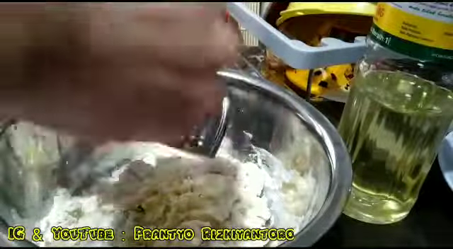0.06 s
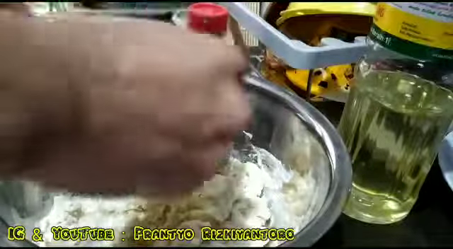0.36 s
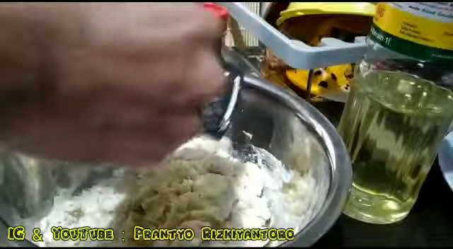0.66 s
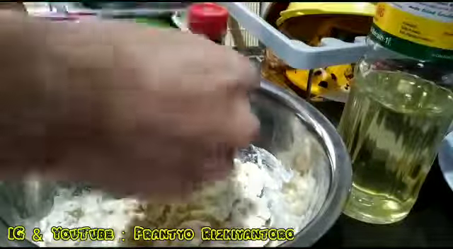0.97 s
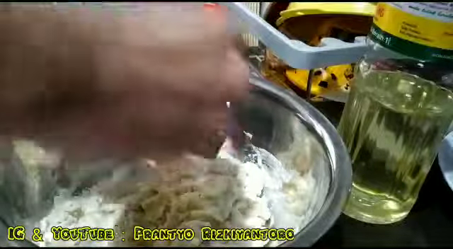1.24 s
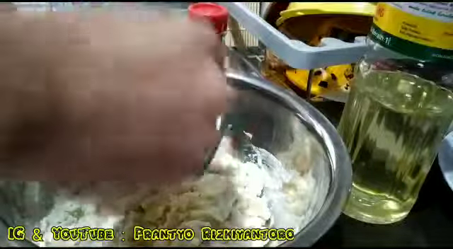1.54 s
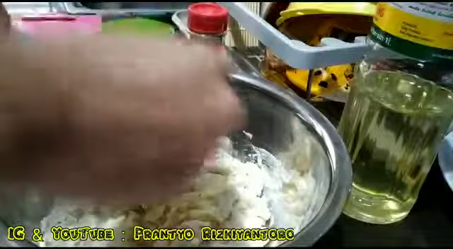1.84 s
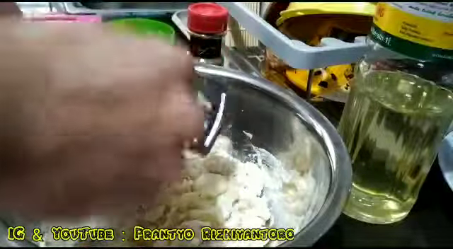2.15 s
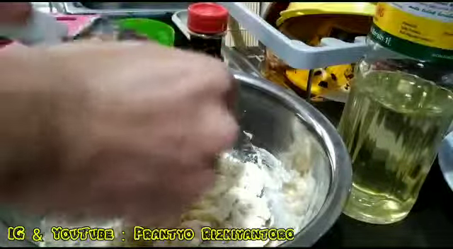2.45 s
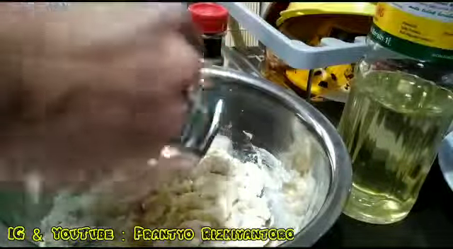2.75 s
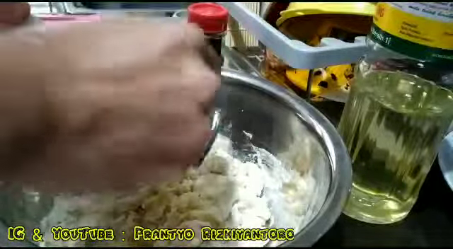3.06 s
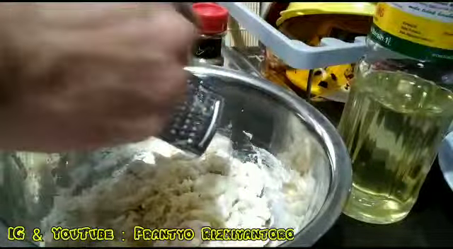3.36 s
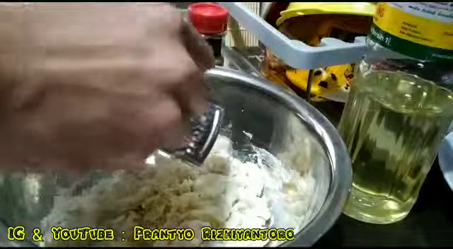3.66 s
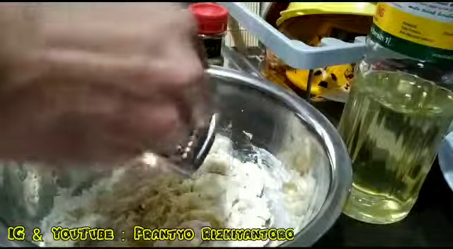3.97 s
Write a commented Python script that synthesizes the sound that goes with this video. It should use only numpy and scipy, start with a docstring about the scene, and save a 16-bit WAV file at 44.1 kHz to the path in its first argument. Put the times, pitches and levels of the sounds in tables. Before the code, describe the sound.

A small steel grater rasps close to the microphone as something firm is rubbed back and forth over a bowl. The strokes ease off, resume and end with a metallic clink. Kitchen hiss and distant engine hum lie behind.

```python
"""A kitchen, the stereo microphone close to a small steel grater held over a bowl.
A firm ingredient is rubbed to and fro, five cuts a second, easing off midway; the teeth tear tiny
grains that make the sheet ring, and at the end the grater clinks against metal.
Further back, behind the room's hiss, a fan hums. Out in the street one engine slows to an idle,
another drones and fades, and a faint whine comes and goes."""
import sys
import numpy as np
from scipy import signal
from scipy.fft import rfft, irfft
from scipy.io import wavfile

SR = 44100
rng = np.random.default_rng(int(sys.argv[2]) if len(sys.argv) > 2 else 0)


def to_wav(sig):
    """Store sig (one row per channel, or 1-D mono) as 16-bit WAV at the path in sys.argv[1].

    Samples outside -1..1 are clipped; the rate is SR.
    """
    pcm = np.clip(np.atleast_2d(sig), -1, 1) * 32767
    pcm = np.round(pcm).astype(np.int16)
    wavfile.write(sys.argv[1], SR, pcm.T)  # frames by channels


N = 176400
TIME = np.arange(N) / SR
HZ = np.maximum(np.fft.rfftfreq(N, 1 / SR), 1)

# cuts and lighter returns, close up: fastest moment t/s, rise/s, fall/s, relative level/dB, body gain/dB
CUT_STROKES = [(0.088, 0.039, 0.038, -46, 0.5), (0.296, 0.036, 0.034, -48.5, -2),
               (0.474, 0.016, 0.063, -49.5, 1), (0.698, 0.038, 0.052, -50.5, 1),
               (0.933, 0.044, 0.037, -51, 1), (1.133, 0.037, 0.028, -50.5, -0.5),
               (1.344, 0.043, 0.032, -43.5, 2.7), (1.538, 0.04, 0.039, -43.5, 0),
               (1.743, 0.037, 0.04, -42.5, -0.5), (1.949, 0.033, 0.038, -44.5, 2),
               (2.153, 0.04, 0.028, -46.5, 0.5), (2.41, 0.078, 0.046, -67, 7),
               (2.532, 0.025, 0.053, -64, 2.5), (2.787, 0.046, 0.033, -56.5, 2.5),
               (3.012, 0.05, 0.025, -46, 0)]
RETURN_STROKES = [(0.015, 0.042, 0.022, -57, -1), (0.181, 0.064, 0.053, -58.5, -3),
                  (0.376, 0.042, 0.063, -61, -2), (0.597, 0.033, 0.051, -59.5, -2),
                  (0.785, 0.011, 0.084, -54, 3), (1.018, 0.038, 0.083, -67.5, -2),
                  (1.226, 0.045, 0.05, -54, -0.5), (1.422, 0.031, 0.05, -53, 2),
                  (1.665, 0.063, 0.017, -53, 1), (1.852, 0.062, 0.058, -59, 2),
                  (2.062, 0.043, 0.029, -55, 2.5), (2.689, 0.053, 0.046, -62.5, 1.5),
                  (2.905, 0.048, 0.029, -59, 2.5), (3.096, 0.042, 0.042, -54.6, -3.5),
                  (3.175, 0.016, 0.06, -59.5, 0), (3.345, 0.089, 0.056, -69.5, 11)]
# colour of the rasp each way: f/Hz, relative level/dB
CUT_SPECTRUM = [(400, -12.5), (1200, -10.5), (2500, -8.5), (3600, -6), (4400, -5.5), (5300, -5),
                (6200, 0.4), (9800, 3.5), (12500, -2), (15500, -7)]
RETURN_SPECTRUM = [(400, -35), (1200, -4), (2500, -3), (3600, -1.5), (5000, -2), (6400, 2.5), (9800, 6),
                   (12500, 1), (15500, -1.5)]
# resonances of the steel sheet: f/Hz, bandwidth/Hz, relative level/dB
SHEET_MODES = [(1210, 71, -11), (3440, 50, -6), (3830, 67, -3), (4400, 90, -9), (5470, 20, 3),
               (6150, 150, -13), (7500, 72, -6), (8500, 80, -7), (8700, 25, -17), (9340, 25, -5),
               (9560, 46, -12), (9773, 40, -12), (10500, 53, -15)]
# the grater's treble sits left of the microphone: f/Hz, left minus right/dB
GRATER_BALANCE = [(2000, -.3), (5500, .4), (9000, 2.4), (12500, 4.4)]
# likeness of the two channels in the room: f/Hz, correlation
ROOM_CORRELATION = [(80, 0.98), (170, 0.75), (330, 0.61), (700, 0.093), (2500, -0.07), (6000, -0.056)]
# room hiss and rumble: f/Hz, relative level/dB
HISS_SPECTRUM = [(20, -26), (35, -8), (55, -1), (135, 5), (170, -10), (260, -4.5), (320, -14.5),
                 (400, -8.5), (520, -17.5), (740, -16), (950, -20.5), (1600, -22), (2500, -23),
                 (4500, -29.5), (9000, -28.5), (12000, -34.5), (15500, -45)]
# its course: t/s, level/dB
HISS_ENVELOPE = [(0, -50), (1.5, -50.5), (2.4, -50.5), (3.2, -52), (4, -52)]
# hum of the fan: f/Hz, level/dB
FAN_TONES = [(49.2, -57.5), (148.3, -59.5), (390, -73), (588, -86.5)]
# the slowing engine outside: t/s, firing rate/Hz
FIRING_RATE = [(0.0, 28.59), (0.3, 28.12), (0.8, 27.04), (1.25, 26.27), (1.65, 24.86), (2.0, 23.83),
               (2.4, 23.02), (2.8, 22.68), (3.4, 22.5), (4.0, 22.19)]
# its swells: t/s, gain/dB
ENGINE_GAIN = [(0, -3.5), (.6, -0.5), (1.3, -1), (1.65, 5.5), (2.25, -3), (2.5, 0.5), (3.0, 0.1),
               (3.22, -0.5), (3.35, -0.5), (4, -2.5)]
# colour of its harmonics and of its puffs: f/Hz, relative level/dB
EXHAUST_SPECTRUM = [(25, -90), (45, -56.5), (52, -52), (68, -53), (80, -59), (91, -45.5), (99, -50.5),
                    (112, -51), (123, -65), (138, -52), (160, -81.5), (205, -70.5), (270, -74.5),
                    (450, -83)]
PUFF_SPECTRUM = [(60, 21), (120, 0), (250, 7), (420, -14), (700, -21), (2000, -28), (6000, -48)]
# the droning engine: t/s, f/Hz, level/dB of each of harmonics 1, 2, 3 and 5
DRONE_TRACK = [(0, 65.73, -50, -48.5, -64.5, -67), (.7, 65.62, -46.5, -48, -63, -66.5),
               (1.05, 65.87, -44.5, -60, -72, -81), (1.45, 70, -46, -55, -69.5, -77),
               (2.15, 70.06, -45, -65, -56.5, -76), (2.7, 69.96, -51, -57.5, -66.5, -88),
               (3.3, 68.76, -55, -63.5, -88, -90), (4, 69.95, -58, -53.5, -68, -90)]
# teeth snapping free: t/s, relative level/dB, decay/s
TOOTH_CATCHES = [(0.06, -42, 0.0069), (0.272, -48, .005), (0.4614, -45, .0055), (0.784, -43.5, .005),
                 (0.7905, -45.5, 0.0039), (0.873, -44, 0.0063), (0.9234, -45, 0.0066),
                 (1.1048, -49, 0.0048), (1.421, -47, .0055), (2.038, -51.5, .005), (2.6835, -55, .0055),
                 (3.206, -41, 0.0084), (3.212, -44, 0.01), (3.2735, -49, .008), (3.4759, -55.5, 0.007)]
# colour of those cracks: f/Hz, relative level/dB
CATCH_SPECTRUM = [(400, -3), (1200, -3.5), (3600, -3), (8000, 2.5), (15500, -1)]
# whine from the street: t/s, f/Hz, level/dB
WHINE_TRACK = [(1.4, 1270, -84), (1.78, 1235, -65.5), (1.98, 1205, -70), (2.13, 1180, -62.5),
               (2.2, 1175, -71), (2.33, 1188, -68), (2.6, 1155, -71), (3.1, 1175, -72.5), (3.6, 1174, -72),
               (4, 1176, -79)]
# a brush against the bowl: t/s, f/Hz, level/dB, t60/s
BOWL_BRUSHES = [(3.349, 2426, -65, 0.2)]
# touches of the closing clink: t/s, relative level/dB
CLINK_TOUCHES = [(3.988, -51), (3.9907, -39.5), (3.9922, -40), (3.9965, -43.5)]
# the modes they strike: f/Hz, relative level/dB, t60/s
METAL_MODES = [(5640, -16, 0.045), (6520, -11, 0.03), (7110, 0.5, 0.024), (7780, -6, 0.017),
               (8600, -12, 0.012), (10200, -13, .02)]


def from_db(db):
    """Decibels to gain."""
    return 10 ** (np.asarray(db) / 20)


def unit_rms(x):
    """Scale to unit rms."""
    return x / np.sqrt(np.mean(x ** 2) + 1e-20)


def in_time(rows):
    """Each column after t/s, interpolated to every sample."""
    times, *columns = np.transpose(rows)
    return [np.interp(TIME, times, column) for column in columns]


def at_hz(points, hz):
    """Read a spectrum on a log-frequency axis."""
    f, value = np.transpose(points)
    return np.interp(np.log(hz), np.log(f), value)


def coloured(x, spectrum):
    """Colour a white signal, keeping its power."""
    return irfft(rfft(x) * unit_rms(from_db(at_hz(spectrum, HZ))), N)


def drift(rate_hz, points=4096):
    """A random wander of unit rms, mostly slower than rate_hz."""
    hz = np.fft.rfftfreq(points, N / SR / points)
    slow = irfft(rfft(rng.standard_normal(points)) / (1 + (hz / rate_hz) ** 2), points)
    return np.interp(np.arange(N) * points / N, np.arange(points), unit_rms(slow))


def tone(turns, db):
    """A sinusoid of the given rms level."""
    return np.sqrt(2) * from_db(db) * np.cos(2 * np.pi * turns)


def ring(start, hz, db, t60):
    """One struck mode dying away."""
    age = np.maximum(TIME - start, 0)
    return from_db(db - 60 * age / t60) * np.sin(2 * np.pi * hz * age)


def diffuse(spectrum):
    """Noise from all round the microphone: the channels alike in the bass, unrelated in the treble."""
    mid, side = rfft(coloured(rng.standard_normal((2, N)), spectrum))
    alike = at_hz(ROOM_CORRELATION, HZ)
    return irfft(np.sqrt((1 + alike) / 2) * mid + np.sqrt((1 - alike) / 2) * side * [[1], [-1]], N)


def reflections(x, t60):
    """Dense dying reflections of unit energy, different in each channel."""
    t = TIME[TIME < t60]
    response = rng.standard_normal((2, SR))[:, :len(t)] * from_db(-60 * t / t60)
    response /= np.sqrt(np.sum(response ** 2, axis=1, keepdims=True))
    return signal.fftconvolve(x, response, axes=1)


def rasp(strokes, spectrum, grains_per_s=4500, rub_share=0.53, tooth_rows_per_s=59, body_edge_hz=7200):
    """Strokes swell and fade; faster rubbing tears more grains, scattered differently to each channel."""
    power = np.zeros(N)
    for fastest, rise, fall, db, _ in strokes:
        from_peak = abs(TIME - fastest) / np.where(TIME < fastest, rise, fall)
        power += from_db(db) ** 2 * np.exp(-2 * from_peak ** 2.52)  # a slightly flat-topped bell
    force = np.sqrt(power)
    activity = np.sqrt(force / force.max()) + 0.036
    sizes = from_db(np.minimum(rng.exponential(1, N), 4)) * rng.choice([-1, 1], (2, N))
    torn = rng.random(N) < grains_per_s * activity / SR
    grains = unit_rms(sizes * torn / np.sqrt(activity))
    tearing = np.sqrt(1 - rub_share) * grains + np.sqrt(rub_share) * rng.standard_normal((2, N))
    roughness = from_db(-1.07 * drift(tooth_rows_per_s))
    sound = coloured(force * tearing * roughness, spectrum)
    body = irfft(rfft(sound) / (1 + (HZ / body_edge_hz) ** 10), N)
    body_gain = from_db(in_time(strokes)[-1])
    return sound + (body_gain - 1) * body


def steel_sheet(x, ring_db=-6):
    """The hand-damped steel adds its resonances to the rasp."""
    out = x.copy()
    for hz, width, db in SHEET_MODES:
        radius = np.exp(-np.pi * width / SR)
        feedback = [1, -2 * radius * np.cos(2 * np.pi * hz / SR), radius ** 2]
        out += from_db(db + ring_db) * (1 - radius ** 2) * signal.lfilter([1, 0, -1], feedback, x)
    return out


def mottled(x, spread_db=2.4, rate_hz=14):
    """Narrow treble bands of the rasp swell and sink at random, giving a mottled shimmer."""
    centres_hz = np.linspace(2600, 15500, num=56)
    spectrum = rfft(x)
    bands = (irfft(spectrum * np.interp(HZ, centres_hz, peak), N) for peak in np.eye(len(centres_hz)))
    return sum(band * from_db(spread_db * drift(rate_hz)) for band in bands)


def bowl_reflections(x, moves_per_s=12):
    """The hand keeps moving over the bowl, so one pattern of close reflections fades into the next."""
    hop = SR // moves_per_s
    padded = np.pad(x, ((0, 0), (hop, 2 * hop)))
    out = np.zeros((2, N + SR))
    for i in range(0, N + hop, hop):
        echo = reflections(padded[:, i:i + 2 * hop] * signal.windows.cosine(2 * hop), t60=0.043)
        out[:, i:i + echo.shape[1]] += echo
    return out[:, hop:hop + N]


def room_hiss():
    """The kitchen's nearly steady hiss and rumble, on all sides."""
    return from_db(in_time(HISS_ENVELOPE)[0]) * diffuse(HISS_SPECTRUM)


def fan():
    """A fan in the background hums on a few steady tones."""
    return sum(tone(hz * TIME + rng.random(), db) for hz, db in FAN_TONES)


def slowing_engine(puff_db=-65.5):
    """Outside, one cylinder thumps through its exhaust, with a dull puff at each firing."""
    firing_hz, = in_time(FIRING_RATE)
    gain_db, = in_time(ENGINE_GAIN)
    turns = np.cumsum(firing_hz) / SR - 0.67  # it fires on each whole turn
    thump = sum(tone(k * turns, at_hz(EXHAUST_SPECTRUM, k * firing_hz)) for k in range(1, 7))
    rattle = sum(tone(k * turns + rng.random() + 0.17 * drift(5), at_hz(EXHAUST_SPECTRUM, k * firing_hz))
                 for k in range(7, 20))
    puff = from_db(puff_db) * (1 + np.cos(2 * np.pi * turns)) * diffuse(PUFF_SPECTRUM)
    return from_db(gain_db) * (thump + rattle + puff)


def droning_engine():
    """A second engine outside reaches the microphone as four wavering harmonics."""
    hz, *levels = in_time(DRONE_TRACK)
    turns = np.cumsum(hz) / SR
    return sum(tone(k * turns + rng.random(), db + 0.5 * drift(0.92))
               for k, db in zip((1, 2, 3, 5), levels))


def tooth_catches(gain_db=-6.5):
    """Short cracks as a tooth catches and lets go."""
    envelope = sum(from_db(db + gain_db) * (TIME >= start) * np.exp(-abs(TIME - start) / decay)
                   for start, db, decay in TOOTH_CATCHES)
    return coloured(envelope * rng.standard_normal((2, N)), CATCH_SPECTRUM)


def street_whine(width_hz=30):
    """A thin, unsteady tone from the street that sinks a little."""
    hz, db = in_time(WHINE_TRACK)
    turns = np.cumsum(hz) / SR
    in_phase, quadrature = tone(turns, db), tone(turns + 1 / 4, db)
    channels = [in_phase * drift(width_hz) + quadrature * drift(width_hz) for _ in range(2)]
    return np.array(channels) / np.sqrt(2)


def bowl_brush():
    """A light brush sets one mode of the bowl ringing."""
    return sum(ring(*brush) for brush in BOWL_BRUSHES)


def clink(spread_db=1.9):
    """A few quick metal touches, each striking the modes with its own strengths."""
    return sum(ring(start, hz, db + mode_db + rng.normal(0, spread_db), t60)
               for start, db in CLINK_TOUCHES for hz, mode_db, t60 in METAL_MODES)


def scene():
    """The grater close up in its bowl and kitchen; hiss, fan and street behind."""
    cuts = from_db(-1.96) * rasp(CUT_STROKES, CUT_SPECTRUM)
    returns = from_db(-1) * rasp(RETURN_STROKES, RETURN_SPECTRUM)
    grater = mottled(steel_sheet(cuts + returns + tooth_catches())) + bowl_brush() + clink()
    bowl = from_db(-1) * bowl_reflections(grater)
    kitchen = from_db(-7.5) * reflections(grater, t60=0.48)[:, :N]
    balance = from_db(at_hz(GRATER_BALANCE, HZ) * np.array([[.5], [-.5]]))
    foreground = irfft(rfft(grater + bowl + kitchen) * balance, N)
    return foreground + room_hiss() + fan() + slowing_engine() + droning_engine() + street_whine()


def record(dry):
    """The microphone drops the deepest bass; the top is cut steeply."""
    bass_cut_hz, top_cut_hz = 35, 15600
    thinned = irfft(rfft(dry) / np.sqrt(1 + (bass_cut_hz / HZ) ** 10), N)
    return signal.sosfilt(signal.ellip(12, .1, 80, top_cut_hz, fs=SR, output="sos"), thinned)


dry = scene()
out = record(dry)
to_wav(out)
```